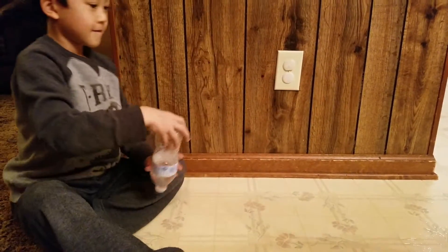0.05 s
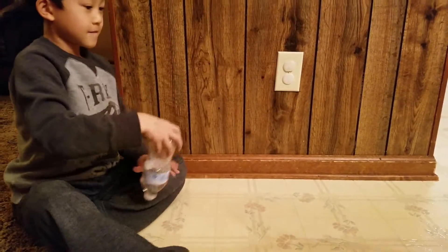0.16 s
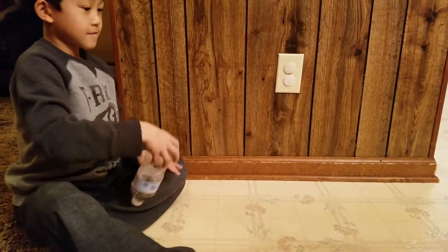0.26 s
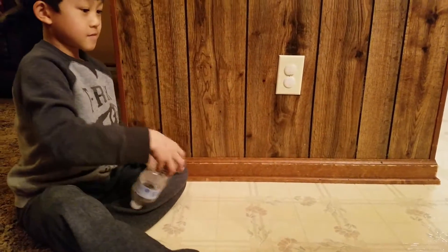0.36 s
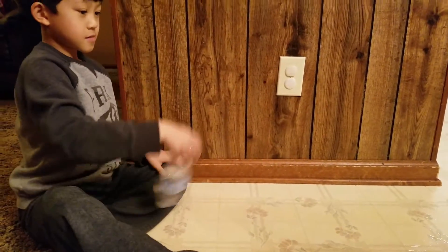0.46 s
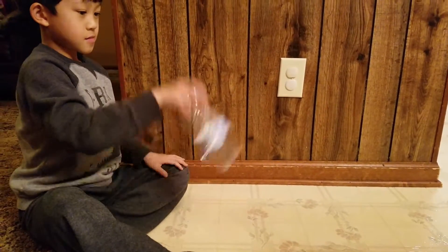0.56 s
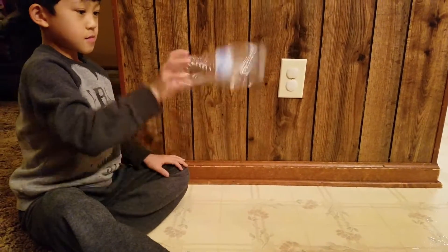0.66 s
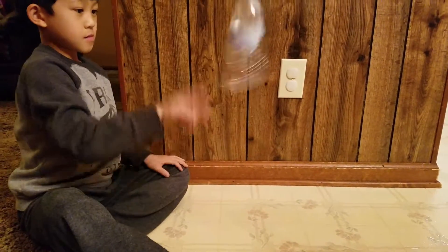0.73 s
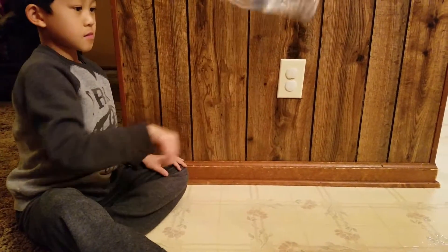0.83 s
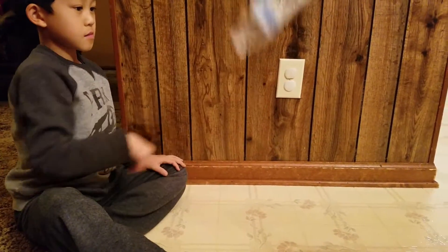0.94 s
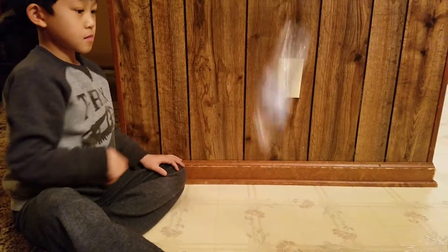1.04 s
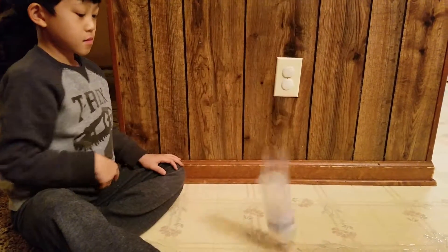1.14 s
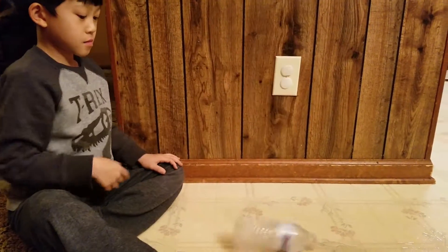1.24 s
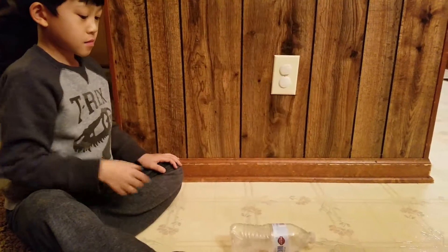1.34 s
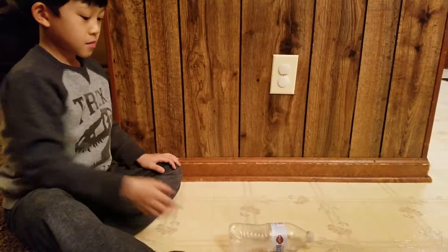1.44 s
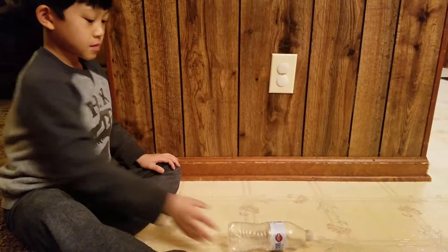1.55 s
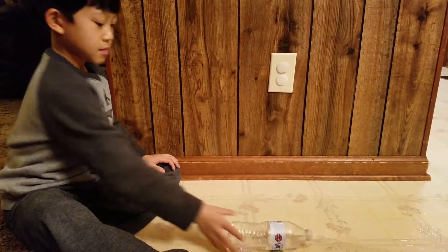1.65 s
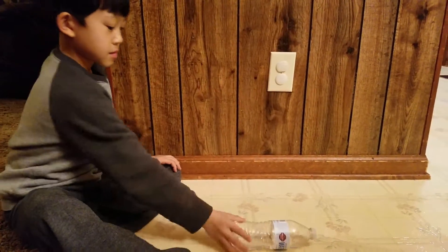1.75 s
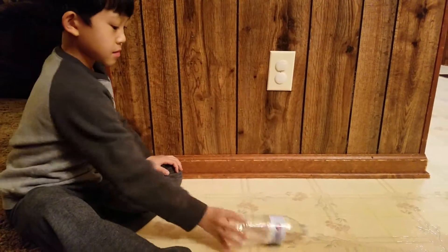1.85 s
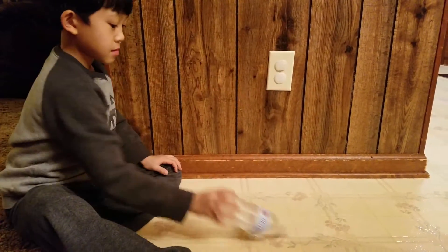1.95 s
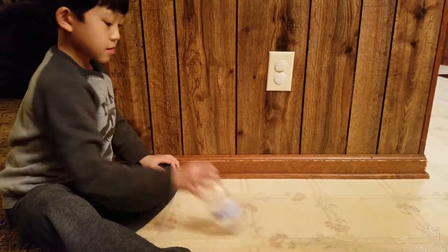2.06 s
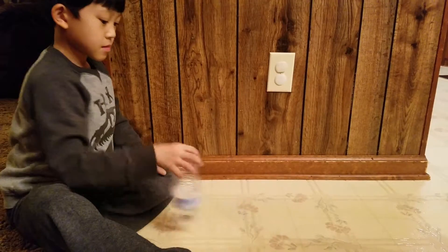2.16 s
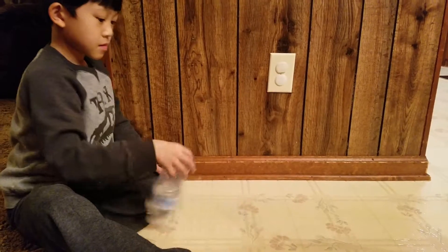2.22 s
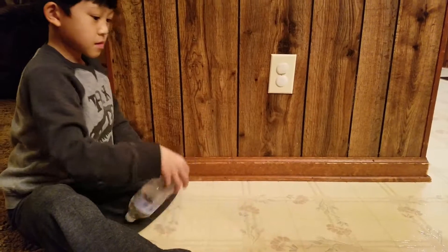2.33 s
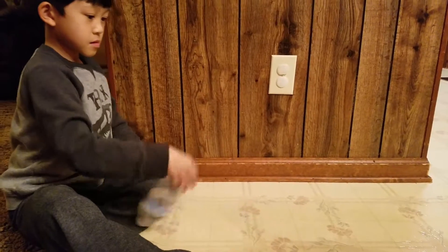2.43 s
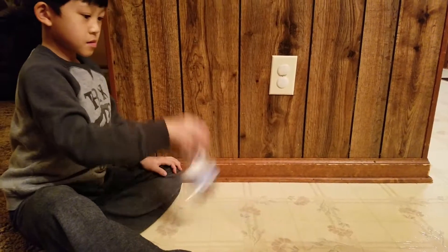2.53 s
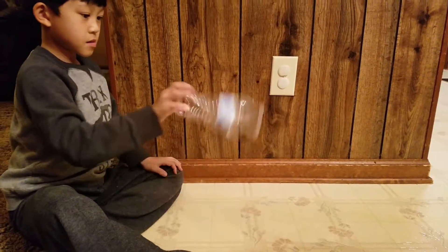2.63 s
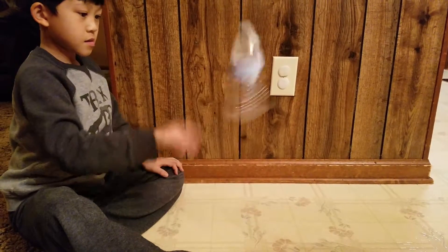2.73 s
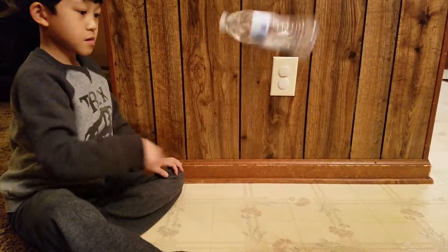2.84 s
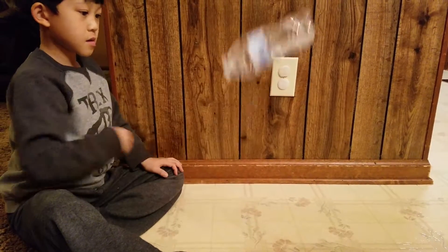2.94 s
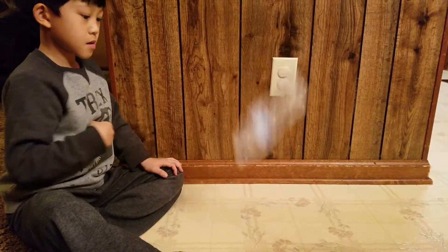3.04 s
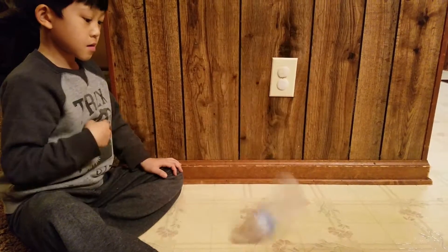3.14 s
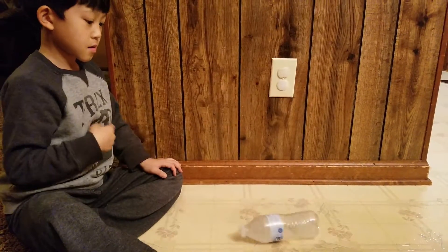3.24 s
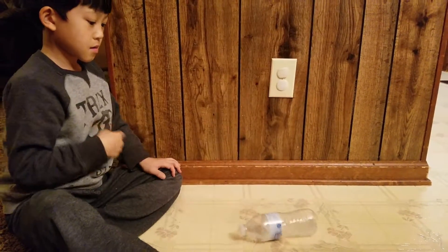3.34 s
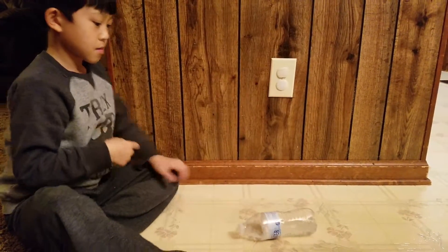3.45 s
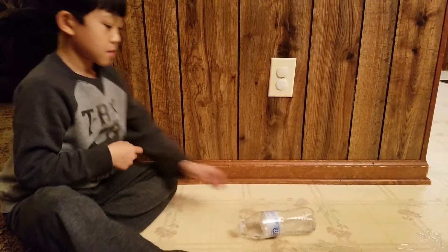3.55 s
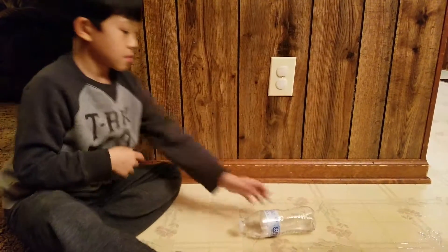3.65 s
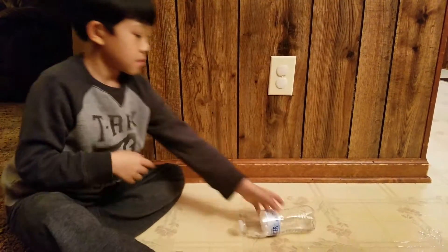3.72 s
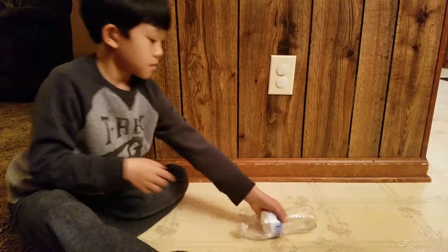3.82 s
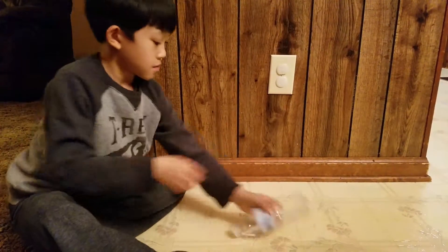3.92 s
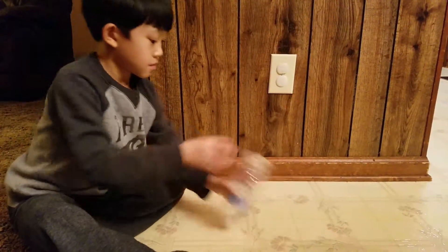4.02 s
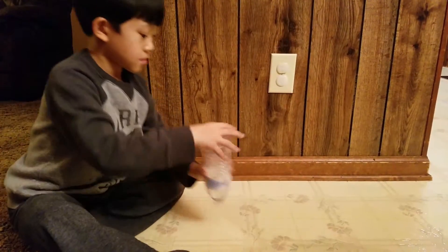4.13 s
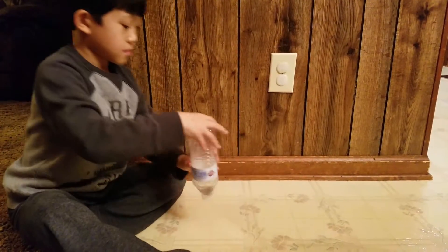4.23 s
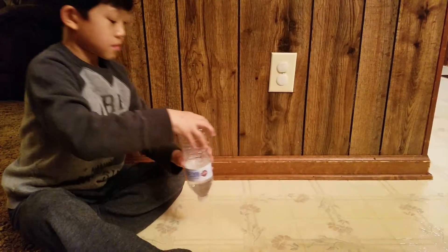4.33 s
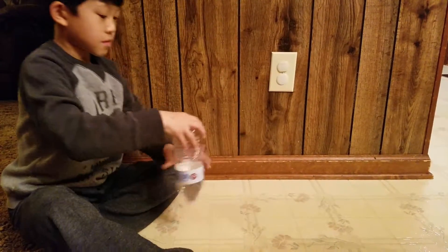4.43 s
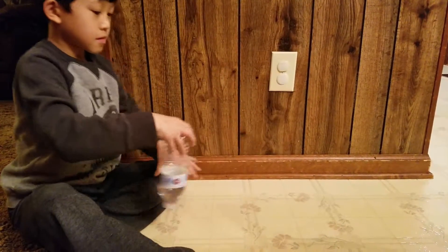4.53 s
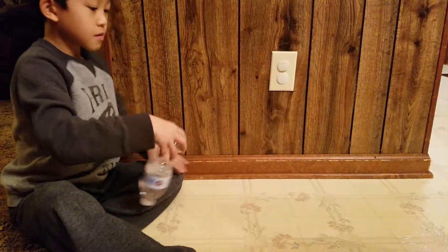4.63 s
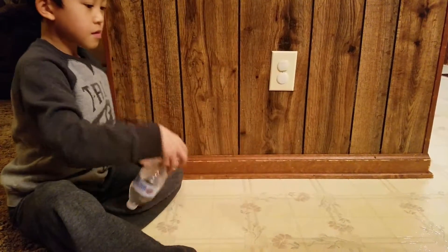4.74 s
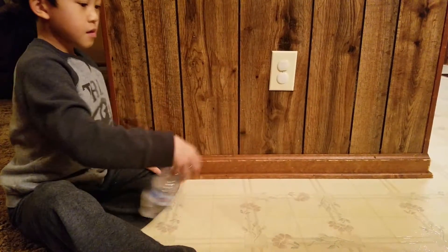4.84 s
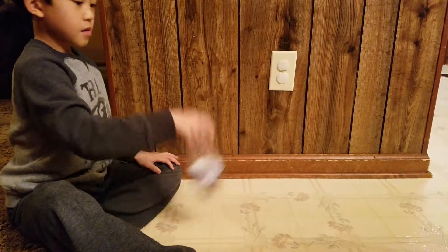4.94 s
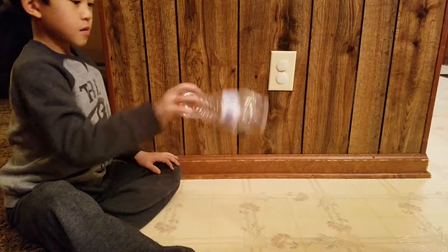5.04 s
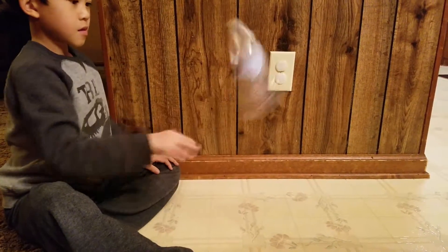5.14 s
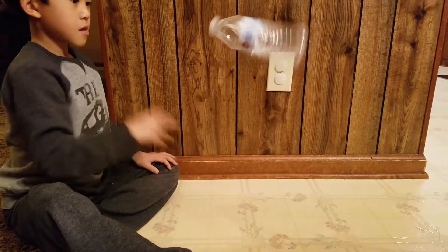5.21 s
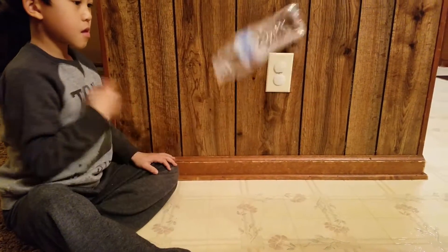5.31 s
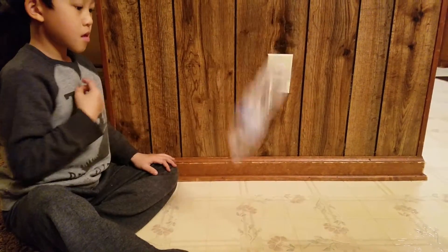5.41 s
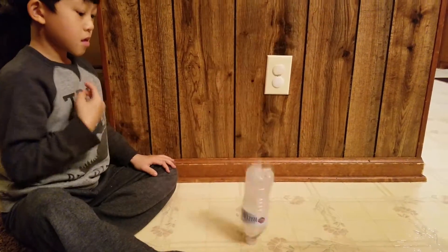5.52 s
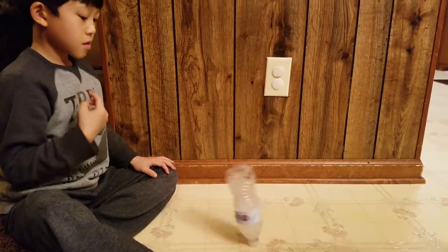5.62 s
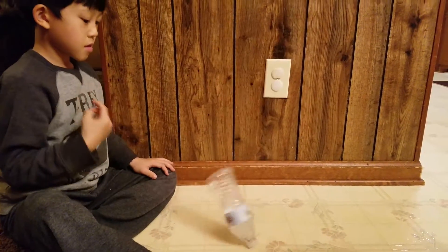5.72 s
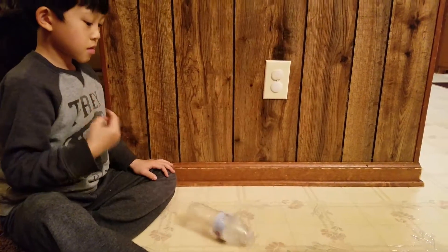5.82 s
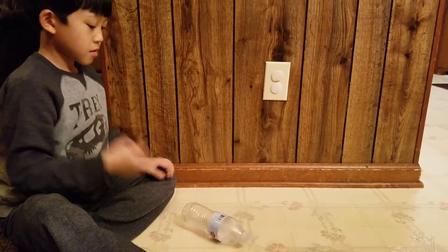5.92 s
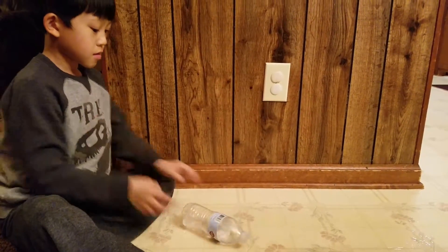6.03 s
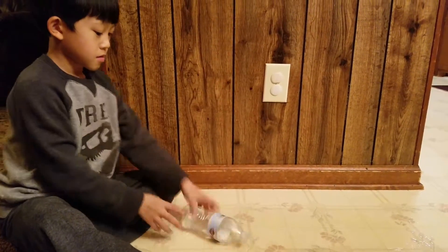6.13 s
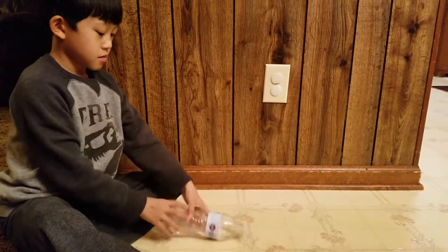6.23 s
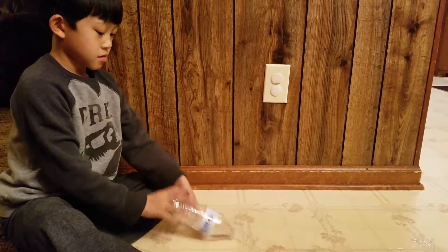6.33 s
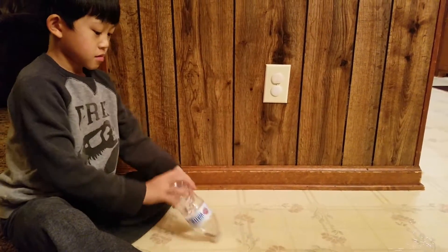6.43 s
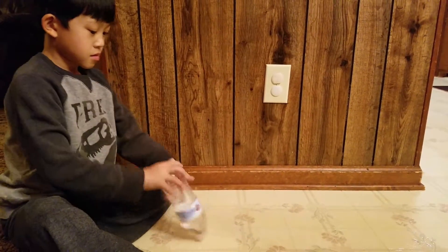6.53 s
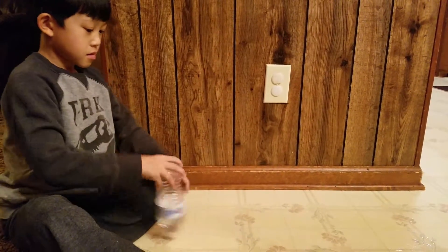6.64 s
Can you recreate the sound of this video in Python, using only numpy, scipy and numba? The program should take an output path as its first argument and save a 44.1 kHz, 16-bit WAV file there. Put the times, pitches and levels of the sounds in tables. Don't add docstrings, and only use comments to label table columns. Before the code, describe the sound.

In a small panelled room, faint crinkles and sloshing precede a very loud hollow smack of a thin plastic bottle on vinyl floor, then a softer bounce. It is picked up with crackles and flipped twice more, landing as hard each time. The last landing is followed by small knocks as it tips. Close phone microphone, short room echo, low background hum.

```python
import sys
import numpy as np
from scipy import signal
from scipy.fft import rfft, irfft
from scipy.io import wavfile
from scipy.ndimage import uniform_filter1d
from numba import njit

SR = 44100
rng = np.random.default_rng(int(sys.argv[2]) if len(sys.argv) > 2 else 0)


def transcribe(u):
    v = np.clip(np.atleast_2d(u).T, -1, 1)
    q = np.round(v * 32767).astype(np.int16)
    wavfile.write(sys.argv[1], SR, q)


def gain_from_decibels(decibels):
    exponent = np.asarray(decibels, float) / 20
    return 10 ** exponent


N = 294147

# f/Hz, level/dB, t60/s
BOARD_MODES = [(67, -20, 0.54), (135, -7.5, 0.054), (224.7, -10, 0.16), (289, -6, 0.053),
               (334.4, -3.5, .08), (403, -3.5, .07), (450.5, 2, 0.039), (559, -2, 0.04),
               (639.6, -0.5, 0.03), (743, -3, 0.043)]
# f/Hz, level/dB, t60/s
SHELL_MODES = [(955, -1, .025), (1176, -2, 0.011), (1502.5, -1, 0.033), (1643, 3.5, 0.0098),
               (1770, -6.5, 0.021), (2083, -3, 0.022), (2350, -2, 0.021), (2614, -5, 0.013)]
# f/Hz, density/dB per Hz
CRACK_SPECTRUM = [(1470, -37.5), (2500, -2), (3140, -16), (4230, 0.5), (4650, 1), (5620, -2.5),
                  (6470, -9.5), (7700, -3), (9080, -18), (10400, -8), (12800, -12.5), (15100, -41),
                  (16400, -41.5)]


def unit(x):
    return x / np.sqrt(np.mean(x ** 2))


def colour(x, table):
    hz, db = np.transpose(table)
    grid = np.maximum(np.fft.rfftfreq(4096, 1 / SR), 1)
    log_gain = np.interp(np.log(grid), np.log(hz), db) * np.log(10) / 20
    cepstrum = irfft(log_gain)
    cepstrum[1:2048] *= 2
    cepstrum[2049:] = 0
    response = irfft(np.exp(rfft(cepstrum)))
    return signal.fftconvolve(x, response)[:len(x)]


def band(x, lo_hz, hi_hz):
    edges_hz = [lo_hz, min(hi_hz, 0.45 * SR)]
    return signal.sosfilt(signal.butter(2, edges_hz, "band", fs=SR, output="sos"), x)


def highpass(x, cutoff_hz):
    return signal.sosfilt(signal.butter(2, cutoff_hz, "high", fs=SR, output="sos"), x)


def pair(mid, side):
    alike_hz = 1500
    side = signal.lfilter(*signal.butter(1, alike_hz, "high", fs=SR), side)
    return np.array([mid + side, mid - side])


def flatten_spectrum(push, fade):
    spectrum = rfft(push)
    return irfft(spectrum / np.abs(spectrum), len(push)) * np.sqrt(fade)


def ring(push, modes, chance, spread_db):
    t = np.arange(len(push)) / SR
    body = np.zeros(len(t))
    for k, ((hz, db, t60), (weight, detune)) in enumerate(zip(modes, chance)):
        sign = (-1) ** k
        mode = np.sin(2 * np.pi * hz * (1 + 0.028 * detune) * t)
        body += sign * gain_from_decibels(db + spread_db * weight) * mode * np.exp(-np.log(1000) * t / t60)
    out = signal.fftconvolve(push, body)[:len(push)]
    return out / np.abs(out).max()


def crack_of(push, peak_db):
    crack = colour(push, CRACK_SPECTRUM)
    return crack * gain_from_decibels(peak_db) / np.abs(crack).max()


def blur(push, rung, lo_hz, hi_hz):
    return unit(band(push, lo_hz, hi_hz)) * np.sqrt(np.mean(rung ** 2))


def add(out, s, direct, around, pan_db):
    port_lag = 3
    rows = zip(out, (direct, direct, around), (0, port_lag, 0), (pan_db / 2, -pan_db / 2, 0))
    for row, sound, lag, db in rows:
        i = int(s * SR) + lag
        row[i:i + len(sound)] += sound[:N - i] * gain_from_decibels(db)


def house():
    # t/s, level/dB
    quiet = [(0.0, -62.5), (0.76, -61), (0.95, -62.5), (1.3, -65.5), (1.45, -73.5), (1.78, -73),
             (2.01, -64), (2.62, -61.5), (2.75, -60), (3.14, -64), (3.29, -53.5), (3.44, -61.5),
             (3.68, -65), (3.98, -61.5), (4.1, -61), (4.44, -62.5), (4.72, -63), (5.57, -61.5), (5.72, -49),
             (5.78, -58.5), (5.94, -58), (6.15, -64.5), (6.48, -58), (6.67, -60.5)]
    # f/Hz, density/dB per Hz
    hum_spectrum = [(20, -36), (50, -21), (95, -6), (140, -1), (250, -9), (340, -4), (400, -10.5),
                    (500, -7.5), (750, -14), (1150, -16.5), (1500, -17), (2600, -15.5), (3300, -24.5),
                    (7000, -34.5)]
    # f/Hz, density/dB per Hz
    hiss_spectrum = [(3000, -61.5), (6000, -42), (9500, -39), (12500, -31.5), (15300, -31), (16400, -49)]
    s, db = np.transpose(quiet)
    noise, step = 0, SR // 12
    for hz in 30 * 2. ** np.arange(10):
        held = np.repeat(rng.standard_normal(N // step + 1), step)[:N]
        flicker = uniform_filter1d(held, size=step)
        octave = band(rng.standard_normal((2, N)), hz / 2 ** 0.5, hz * 2 ** 0.5)
        noise = noise + gain_from_decibels(1.5 * flicker) * octave
    hum = pair(colour(noise[0], hum_spectrum), 1.2 * colour(noise[1], hum_spectrum))
    hiss = np.array([colour(n, hiss_spectrum) for n in rng.standard_normal((2, N))])
    level = gain_from_decibels(np.interp(np.arange(N) / SR, s, db) + 1.5)
    return unit(hum + gain_from_decibels(3) * hiss) * level


def pops():
    # t/s, level/dB, f/Hz, t60/s, crack level/dB re pop, left minus right/dB
    pop_events = [(0.068, -46, 1390, 0.065, -8.5, 10), (0.093, -48.5, 650, 0.024, -15, -1),
                  (0.188, -52.5, 627, 0.062, -29, 6), (0.257, -51.5, 657, 0.12, -36, -1.5),
                  (0.382, -45.5, 1250, 0.025, -21, -2), (0.604, -45.5, 1460, 0.017, -26, 4),
                  (0.649, -46.5, 600, 0.014, -15, 4), (0.731, -49, 2230, 0.021, 7, 4),
                  (0.811, -36.5, 2040, 0.092, -10, 1), (0.863, -47.5, 643, 0.027, 0.5, 3),
                  (1.72, -53, 652, 0.04, -11, -1), (1.823, -41, 1717, 0.059, -0.5, 5.5),
                  (2.01, -45, 2315, 0.018, 3, 7), (2.073, -49.5, 2270, 0.024, -8, 5),
                  (2.203, -48.5, 1990, 0.091, -24, 3.5), (2.228, -47, 2190, 0.064, -9, 5.5),
                  (2.519, -52.5, 1610, 0.04, -24, 7), (2.591, -51, 1590, 0.062, -22, 5),
                  (2.614, -53, 980, 0.04, -18, 2), (2.642, -25.5, 2005, 0.036, 3.5, 6),
                  (2.77, -50, 514, 0.027, 6.5, 9), (2.834, -39, 2500, 0.093, 1.5, 1),
                  (2.874, -40, 1380, 0.035, -26, 3), (3.426, -47.5, 940, 0.04, -19.5, 18),
                  (3.998, -37.5, 2360, 0.076, -26, 7), (4.121, -45.5, 2690, 0.12, -15, 6),
                  (4.161, -40.5, 2550, 0.087, -22.5, -2), (4.239, -43, 2090, 0.049, -1.5, 5),
                  (4.285, -40.5, 1150, 0.047, -39.5, -0.5), (5.055, -28, 1910, 0.031, -3.5, 6),
                  (5.203, -43, 1600, 0.04, 3.5, 6), (5.299, -42.5, 2440, 0.05, -30, 0),
                  (5.955, -39.5, 2085, 0.037, -5, 7.5), (6.154, -43.5, 851, 0.04, -10.5, 1.0),
                  (6.515, -46.5, 699, 0.055, 0.5, 7.5), (6.589, -46.5, 950, 0.017, -11, 11)]
    out, t = np.zeros((3, N)), np.arange(SR // 5) / SR
    fade = np.exp(-t / 0.0016)
    for s, db, hz, t60, crack_db, pan_db in pop_events:
        snap = flatten_spectrum(fade * rng.standard_normal(len(t)), fade)
        modes = sorted([(hz, 5, max(t60, 0.004))] + SHELL_MODES + BOARD_MODES[-3:])
        chance = rng.standard_normal((len(modes), 2))
        panel = gain_from_decibels(db + 1) * ring(snap, modes, chance, spread_db=4.0)
        crack = crack_of(snap, db + crack_db + 3)
        around = 0.61 * blur(snap, panel, 0.43 * hz, 1.4 * hz) + crack
        add(out, s, panel + crack, around, pan_db)
    return out


def room(dry):
    # f/Hz, t60/s, level/dB
    octaves = [(60, .55, -1), (119, 0.29, -2.5), (243, 0.28, 5), (500, .36, -2), (1000, 0.32, -1),
               (2000, 0.28, -3.5), (4120, 0.29, 2), (7870, 0.17, 5.5), (13100, .2, -3.5)]
    t = np.arange(SR) / SR
    tails = np.zeros((2, len(t)))
    for hz, t60, db in octaves:
        noise = band(rng.standard_normal((2, len(t))), hz / 2 ** 0.5, hz * 2 ** 0.5)
        tails += gain_from_decibels(db) * noise * np.exp(-np.log(1000) * t / t60)
    tails *= 1 - np.exp(-(t / 0.002) ** 2)
    return gain_from_decibels(-30) * signal.fftconvolve(dry, pair(tails[0], 0.9 * tails[1]))[:, :N]


def moves():
    # t/s, hiss level/dB, slosh level/dB re hiss
    gestures = [
        [(0.45, -84, 13), (0.492, -89, 13), (0.508, -62.5, -6), (0.546, -84, 10), (0.68, -95, 13),
         (0.74, -59.5, 2), (0.804, -61, 3), (0.81, -61.5, 5), (0.916, -67.5, -4), (1.05, -87.5, 8)],
        [(2.03, -62.5, 0.5), (2.068, -83, 2.5), (2.074, -57.5, -1.5), (2.196, -79, 2), (2.204, -73, 14),
         (2.336, -75, 10.5), (2.4, -75.5, -6)],
        [(2.7, -63, 9), (2.724, -62, 1), (2.824, -69, 14), (2.838, -56, -12), (2.846, -56, 18),
         (2.894, -61, 9.5), (3.08, -100, -4)],
        [(4.05, -74, 17.5), (4.1, -88, 24), (4.158, -53, 5), (4.22, -66, 15), (4.238, -56.5, 2.5),
         (4.326, -77, 13), (4.436, -70, 8.5), (4.5, -75, 3)],
        [(4.85, -89, 20), (4.874, -76.5, 13), (4.98, -67.5, -9.5), (5.046, -93.5, -4.5), (5.056, -55, 10.5),
         (5.116, -67, 12), (5.172, -54.5, 2), (5.374, -92, 7.5), (5.388, -70.5, 3), (5.45, -93.5, 12.5)],
        [(6.1, -98.5, -11), (6.122, -78, 14.5), (6.216, -76.5, 16.5), (6.22, -64, -12), (6.28, -83, 16.5)],
        [(6.45, -79, -1), (6.458, -85, 12), (6.516, -62.5, 1), (6.522, -77.5, -0.5), (6.542, -57, 3.5),
         (6.67, -72, 12)],
    ]
    t, hiss, slosh = np.arange(N) / SR, np.zeros(N), np.zeros(N)
    for table in gestures:
        s, hiss_db, slosh_db = np.transpose(table)
        hiss += np.interp(t, s, gain_from_decibels(hiss_db), 0, 0)
        slosh += np.interp(t, s, gain_from_decibels(hiss_db + slosh_db), 0, 0)
    size = np.minimum(rng.exponential(size=(4, N)), 8)
    grains = rng.standard_normal((4, N)) * gain_from_decibels(2.4 * size)
    fine = [unit(colour(g, CRACK_SPECTRUM)) for g in grains[:2]]
    wet = [unit(band(g, 900, 2900)) for g in grains[2:]]
    cloth = gain_from_decibels(-5.0) * hiss * pair(fine[0], 0.8 * fine[1])
    water = gain_from_decibels(-6.0) * slosh * pair(wet[0], 1.1 * wet[1])
    return cloth + water


def blows():
    # t/s, shell level/dB, thud level/dB re shell, crack level/dB re shell, buckling time/s, thud centre f/Hz
    impacts = [(1.155, -3.5, -7, -12, 0.006, 450), (1.271, -22.5, -8, -13, 0.0055, 490),
               (1.915, -35, -4, -13, 0.0042, 227), (1.951, -41.5, -5, -16, 0.0037, 388),
               (3.126, -7.5, -0.5, -11, 0.0091, 230), (3.174, -13.5, -7, -10, 0.0066, 232),
               (3.765, -45, -11, -17.5, 0.015, 315), (3.931, -29, -4, -21, 0.006, 404),
               (5.526, -2.5, -3.5, -10, 0.0048, 459), (5.809, -38, -2.5, -12.5, 0.0056, 193),
               (5.834, -27.5, -9, -12, 0.006, 204), (5.895, -46, -1.5, -17, 0.0084, 218),
               (6.115, -55, 2, -17, 0.0045, 213), (6.297, -41, 1.5, -19, 0.005, 318),
               (6.373, -48.5, -4.5, -20, 0.0047, 525)]
    out, t = np.zeros((3, N)), np.arange(SR // 2) / SR
    for s, shell_db, thud_db, crack_db, buckle_s, thud_hz in impacts:
        fade = np.exp(-t / max(buckle_s, 0.001))
        buckles = (rng.random(len(t)) < 0.03) * rng.standard_normal(len(t)) * fade
        buckles[0] = -1.2
        buckles = flatten_spectrum(buckles, fade)
        chance = rng.standard_normal((len(BOARD_MODES) + len(SHELL_MODES), 2))
        boards = [(hz, db - 3.7 * abs(np.log2(hz / thud_hz)), t60) for hz, db, t60 in BOARD_MODES]
        thud = gain_from_decibels(shell_db + thud_db + 6) * ring(buckles, boards, chance, spread_db=3.0)
        shell = gain_from_decibels(shell_db + 4) * ring(buckles, SHELL_MODES, chance[len(BOARD_MODES):], spread_db=5.0)
        crack = crack_of(buckles, shell_db + crack_db + 13)
        shell_around = gain_from_decibels(-1) * blur(buckles, shell, 700, 2800) + crack
        thud_around = 0.7 * blur(buckles, thud, 0.41 * thud_hz, 1.9 * thud_hz) + 0.44 * thud
        add(out, s, shell + crack, shell_around, pan_db=4)
        add(out, s, thud, thud_around, pan_db=-1.5)
    return out


def scene():
    bottle = highpass(blows() + pops(), 75)
    return bottle[:2] + room(bottle[2:]) + moves() + house()


@njit
def follow(x, attack, release):
    e, out = 0., np.empty(len(x))
    for i in range(len(x)):
        e += (x[i] - e) * (attack if x[i] > e else release)
        out[i] = e
    return out


def roll_off(x):
    return signal.sosfilt(signal.butter(12, 16520, fs=SR, output="sos"), x)


def record(dry):
    attack_s, release_s = 0.0008, 0.018
    envelope = follow(np.abs(dry).max(axis=0), 1 / (attack_s * SR), 1 / (release_s * SR))
    gain = np.minimum(1, gain_from_decibels(-9) / (envelope + 1e-9)) ** 0.6
    limited = np.tanh(1.19 * dry * gain) * 0.95
    return roll_off(highpass(limited, 38))


dry = scene()
out = record(dry)
transcribe(out)
```